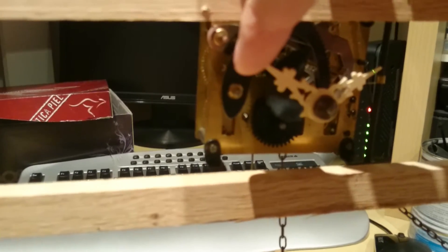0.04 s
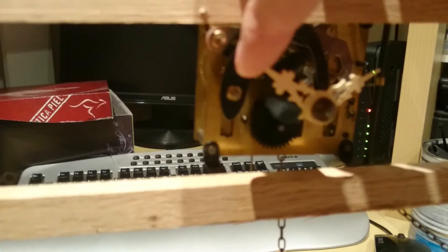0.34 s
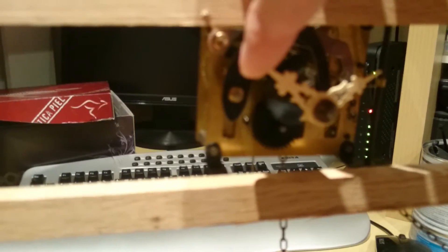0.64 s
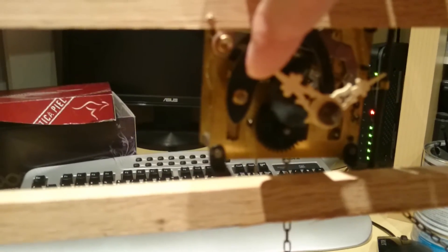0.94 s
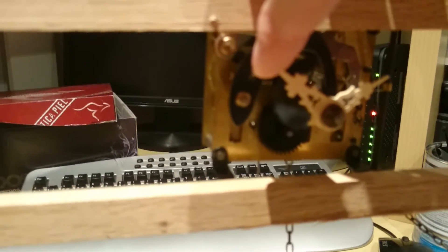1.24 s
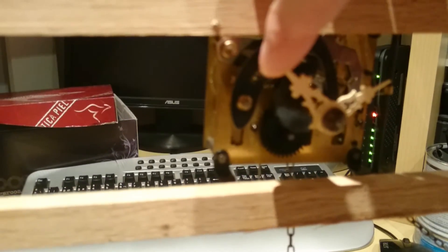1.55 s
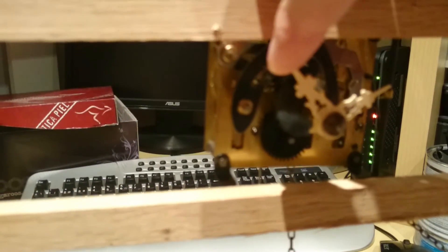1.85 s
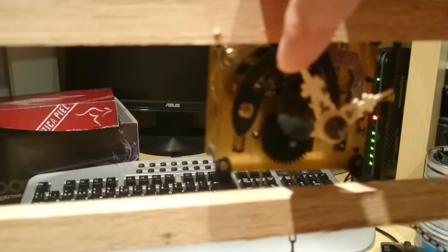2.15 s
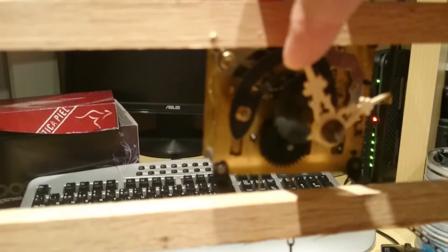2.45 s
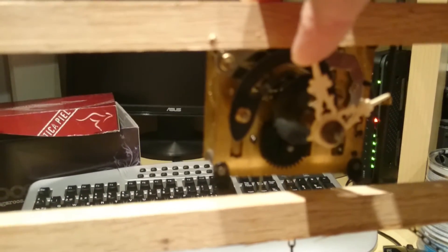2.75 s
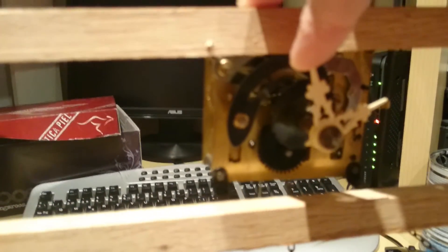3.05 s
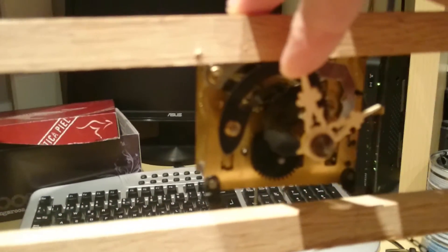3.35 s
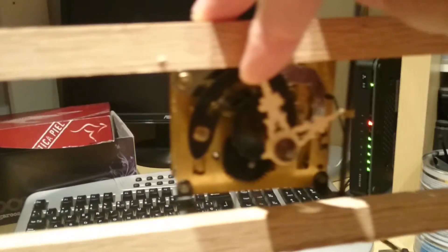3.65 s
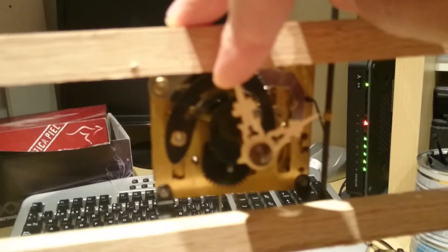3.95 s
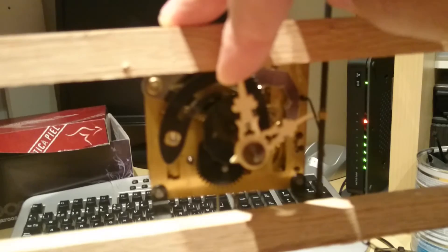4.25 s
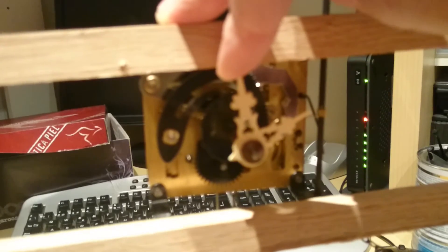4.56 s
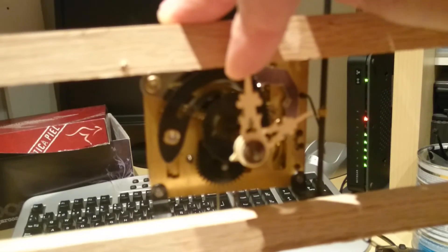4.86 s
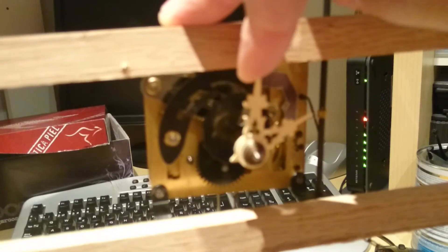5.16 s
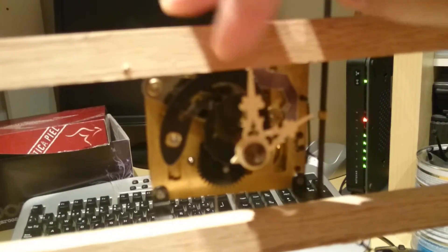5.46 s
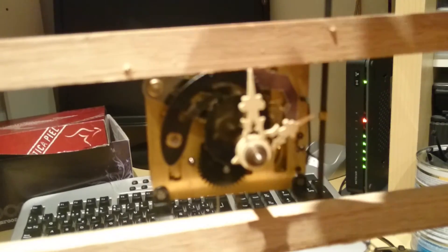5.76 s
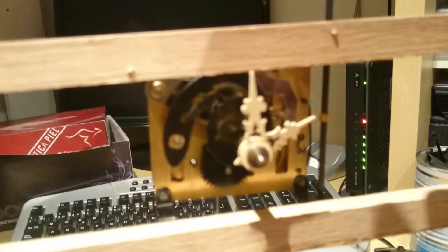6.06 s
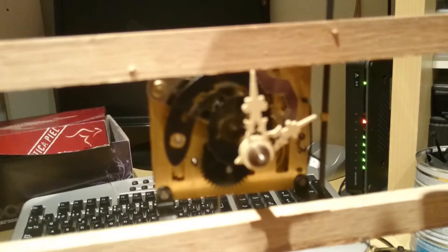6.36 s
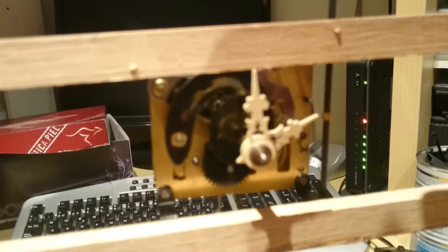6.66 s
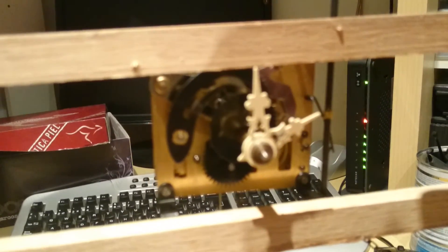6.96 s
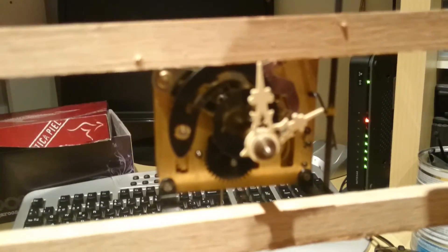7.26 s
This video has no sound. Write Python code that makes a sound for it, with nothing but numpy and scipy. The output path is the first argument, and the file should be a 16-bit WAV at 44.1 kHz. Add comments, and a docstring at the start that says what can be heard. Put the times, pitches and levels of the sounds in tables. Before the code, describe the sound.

A brass clock movement is heard close up in a small quiet room with a faint steady hiss. As its hand is pushed round, there is a quick cluster of faint ticks at about 1.1 seconds, fainter ones near 1.7 and 2.2, and another at 4.2. At 5.2 seconds a steel lever drops with a bright double click, and the gears spin up into a much louder, fast whirring rattle, dotted with small clicks and scrapes. A hammer falls twice, at about 5.8 and 6.5 seconds, each time with a short metallic clank and a brief low hum from its swinging wire. At 6.8 seconds the wheels slam against their stop with a hard clack, a slight thud and two quick rebounds. The whirr dies at once, leaving only the quiet hiss from just after 7 seconds.

```python
"""A finger pushes the minute hand of a brass clock movement round to the hour, with a few faint ticks.
At 5.2 s a lever drops and frees the strike train: the wheels spin up and whirr, tooth against pinion.
They lift and drop the hammer twice; it clanks and swings on its wire. At 6.8 s the train slams
against its stop and bounces. Heard close up in a small quiet room."""
import sys
import numpy as np
from scipy import signal
from scipy.fft import rfft, irfft, next_fast_len
from scipy.io import wavfile
from scipy.ndimage import uniform_filter1d, map_coordinates

SR = 44100
rng = np.random.default_rng(int(sys.argv[2]) if len(sys.argv) > 2 else 0)


def transcribe(u):
    """Save the signal u as a 16-bit wav file named by the first command-line argument.

    u: samples, shape (n,) or (channels, n), limited to [-1, 1]; the rate is SR.
    q: integer samples, one column per channel.
    """
    v = np.clip(np.atleast_2d(u).T, -1, 1)
    q = np.round(v * 32767).astype(np.int16)
    wavfile.write(sys.argv[1], SR, q)


N = 348390
TIME_S = np.arange(N) / SR
FFT_SIZE = next_fast_len(N + SR)
HZ = np.fft.rfftfreq(FFT_SIZE, 1 / SR)
LANDING_S = 0.029  # hammer snap to landing

# Fall and bounce of the release lever. Each row: time in seconds, level in dB.
LEVER_DROPS = [(5.237, -22), (5.2623, -30)]
# Hammer strokes. Each row: snap time in seconds, level in dB, delay of the swing in seconds.
HAMMER_STROKES = [(5.761, 1, 0.011), (6.46, -0.5, .006)]
# Slam and two rebounds. Each row: time in seconds, crack in dB, shudder in dB, rise in seconds.
STOP_SLAMS = [(6.8093, -8.5, -24, 0.0014), (6.866, -12.5, -31.5, .0035), (6.927, -27.5, -35, .001)]
# Colour of the movement. Each row: frequency in Hz, left gain in dB, right gain in dB.
BRASS_COLOUR = [(204, -36.5, -22.5), (370, -24, -17.5), (520, -24.5, -14), (1210, -18, -14.5),
                (2400, -17, -14), (3520, -19, -7), (5814, -5, -14.5), (5470, -9.5, 0.5), (6660, 2, -18.5),
                (6970, -8, -12), (8070, -8.5, -16.5), (9600, -11, -22.5), (10800, -24, -20.5),
                (13000, -23, -17), (15500, -32, -17)]


def train(level_db, teeth_per_s, chatter_db, scatter_db, tooth_t60_s, rub_db, waver_db):
    """Each tooth strikes its pinion; the loose fly chatters between them, and the pivots rub."""
    pace = train_pace()
    tooth_hz = teeth_per_s * pace
    teeth = np.diff(np.floor(np.cumsum(tooth_hz) / SR), prepend=0)
    chatter = rng.random(N) < 2 * tooth_hz / SR
    chance_db = scatter_db * rng.standard_normal(N)
    blows = teeth * amp(chance_db / 2) + chatter * amp(chatter_db + chance_db)
    energy_pole = decay(2 / SR, tooth_t60_s)
    strikes = signal.lfilter([1], [1, -energy_pole], blows ** 2) * pace  # slow teeth land softly
    rub = amp(rub_db) ** 2 * np.sqrt(pace)
    force = amp(level_db + waver_db * wobble(knots_per_s=22)) * tooth_force()  # uneven mesh

    def drive(energy):
        return np.sqrt(energy / energy[pace > 0.5].mean()) * force * grit()

    body = brass(low_hz=160, high_hz=18000)
    low_share = 1 / (1 + (HZ / 9000) ** 8)  # mostly blows below 9 kHz, rubbing above
    whirr = filtered(drive(strikes + rub / 10), body * np.sqrt(low_share))
    return whirr + filtered(drive(strikes / 10 + rub), body * np.sqrt(1 - low_share))


def train_pace(spin_up_s=0.18, run_down_s=0.06):
    """Speed, 0-1: the freed train rises to what its fly allows and runs down at the stop."""
    running_s = np.maximum(TIME_S - LEVER_DROPS[0][0], 0)
    stopped_s = np.maximum(TIME_S - STOP_SLAMS[0][0], 0)
    return (1 - np.exp(-running_s / spin_up_s)) * np.exp(-(stopped_s / run_down_s) ** 2 / 2)


def tooth_force():
    """Faster wheels hit harder."""
    return amp(-47) * train_pace() ** 1.82


def hammer(wire_hz, swell_s, swing_t60_s, tremble_db, tremble_width_hz,
           clank_db, jolt_db, swing_db, shake_db):
    """The hammer clanks and swings on its wire; the train keeps it trembling, a rebound jolts it."""
    # Each row: mode frequency in Hz, level in dB, t60 in seconds.
    modes = [(512, -11.5, 0.33), (715, -16, 0.2), (1030, -7, 0.16), (1063, -1.5, 0.18), (1456, -3.5, 0.12),
             (1640, -2, .07), (1706, 3.5, 0.19), (1810, -4, 0.08)]
    clanks, swing = np.zeros((2, N)), np.zeros(N)
    t = np.arange(SR) / SR
    swell = 1 - np.exp(-(t / swell_s) ** 2)
    sway = swell * decay(t, swing_t60_s) * np.sin(2 * np.pi * wire_hz * t)
    for at_s, db, delay_s in HAMMER_STROKES:
        add(clanks, at_s, amp(db + clank_db) * ring(modes))
        add(clanks, at_s + LANDING_S, amp(db + clank_db) * ring(modes))
        add(swing, at_s + delay_s, amp(db + swing_db) * sway)
    rebound_s = STOP_SLAMS[1][0]
    add(clanks, rebound_s, amp(jolt_db) * ring(modes))
    add(swing, rebound_s, amp(shake_db) * sway)
    tremble = amp(tremble_db) * tooth_force() * train_pace() ** 3
    wire = unit(1 / (1 + (2 * (HZ - wire_hz) / tremble_width_hz) ** 2))
    swing += filtered(tremble * rng.standard_normal(N), causal(wire))
    return clanks * amp([[-4], [2]]) + swing * [[-0.56], [1]]  # bass in antiphase left to right


def hammer_blows(snap_db, snap_t60_s, landing_db, landing_t60_s):
    """Plate drive of each stroke: a blunt snap off the pin, then a sharper landing."""
    snaps, landings = np.zeros((2, N))
    for at_s, db, _ in HAMMER_STROKES:
        snaps += amp(db + snap_db) * contact(at_s, snap_t60_s, rise_s=0.002, hold_s=0.0054)
        landings += amp(db + landing_db) * contact(at_s + LANDING_S, landing_t60_s, rise_s=0.00068)
    return in_bands(snaps, low_db=-10, top_db=-8) + in_bands(landings, low_db=-23.5, top_db=-11)


def stop(crack_t60_s, shudder_t60_s):
    """Plate drive of each slam: a hard crack, then the whole movement shudders."""
    cracks, shudders = np.zeros((2, N))
    for at_s, crack_db, shudder_db, rise_s in STOP_SLAMS:
        cracks += amp(crack_db) * contact(at_s, crack_t60_s, rise_s)
        shudders += amp(shudder_db) * contact(at_s, shudder_t60_s, rise_s, hold_s=0.008)
    return in_bands(cracks, low_db=-29.5, top_db=-15.5) + in_bands(shudders, low_db=-6, top_db=-5)


def knocks(click_t60_s, scrape_t60_s):
    """Plate drive of levers that scrape along the turning wheels and click off an edge."""
    # Each row: time in seconds, click in dB, its top band in relative dB, scrape in dB,
    # scrape lead in seconds.
    events = [(0.077, -56.5, -21, -60, 0), (5.215, -48.5, 1, -50, 0.0023), (5.438, -34, -9.5, -50.5, 0.028),
              (5.593, -20.5, -8, -38.5, 0.0164), (5.9675, -21, -18, -35, 0.023), (5.989, -33, -6, -38, 0),
              (6.168, -26, -8, -37, .014), (6.6495, -21, -4.5, -36.5, 0.004),
              (6.782, -26.5, -16, -42, 0.006)]
    drive = np.zeros((3, N))
    for at_s, click_db, top_db, scrape_db, lead_s in events:
        click = amp(click_db) * contact(at_s, click_t60_s, rise_s=0.001)
        scrape = amp(scrape_db) * contact(at_s - lead_s, scrape_t60_s, rise_s=0.002, hold_s=lead_s)
        drive += in_bands(click, low_db=-20, top_db=top_db) + in_bands(scrape, low_db=-4.5, top_db=-7)
    return drive


def plates(drive, level_db):
    """The brass plates sound each contact in a low, a middle and a top band."""
    bands_hz = [(590, 2550), (2380, 10020), (9500, 17910)]
    bands = [filtered(envelope * grit(), brass(*edges)) for envelope, edges in zip(drive, bands_hz)]
    return amp(level_db) * sum(bands)


def lever(ring_db, crack_db, crack_t60_s, rattle_db, rattle_t60_s):
    """The steel release lever lands with a crack and a short bright ring, and shakes the plates."""
    # Each row: mode frequency in Hz, level in dB, t60 in seconds.
    modes = [(634, -18, 0.15), (1296, -3.5, 0.072), (1550, -11.5, .06), (2495, -2, 0.078),
             (3600, -9.5, 0.12), (3790, -11.5, 0.096), (4910, -11, 0.045), (7390, 4.5, 0.038),
             (9600, -2.5, 0.061), (11100, -7, 0.099)]
    rings, cracks, rattles = np.zeros((2, N)), np.zeros(N), np.zeros(N)
    for at_s, db in LEVER_DROPS:
        add(rings, at_s, amp(db + ring_db) * ring(modes))
        cracks += amp(db + crack_db) * contact(at_s, crack_t60_s, rise_s=0.00056)
        rattles += amp(db + rattle_db) * contact(at_s, rattle_t60_s, rise_s=0.00099)
    crack = brass_noise(cracks, low_hz=6900, high_hz=16000)
    return rings + crack + brass_noise(rattles, low_hz=670, high_hz=4850)


def low_rattle(level_db, swell_s, t60_s, thud_db, thud_t60_s):
    """A low rattle swells as the train nears its stop; the slams thud through the wooden stand."""
    slam_s, rebound_s = STOP_SLAMS[0][0], STOP_SLAMS[1][0]
    swell = amp(level_db) * contact(slam_s, t60_s, swell_s, hold_s=rebound_s - slam_s)
    thuds = sum(amp(db + thud_db) * contact(at_s + 0.005, thud_t60_s, rise_s=0.004)
                for at_s, _, db, _ in STOP_SLAMS)
    return brass_noise(swell, low_hz=560, high_hz=1696) + brass_noise(thuds, low_hz=150, high_hz=430)


def hand_ticks(rise_s, t60_s):
    """Teeth behind the dial slip into place and ring the pushed hand; soft slips are duller."""
    # Each row: time in seconds, level in dB, ring in relative dB, low-pass cutoff in Hz.
    ticks = [(1.114, -44.5, -15, 15000), (1.135, -46, -20, 15000), (1.151, -48, -13.5, 15000),
             (1.684, -55.5, -23, 8000), (2.171, -57, -25, 11000), (2.196, -59, -24, 13000),
             (4.175, -47, -26, 11100)]
    # Each row: mode frequency in Hz, level in dB, t60 in seconds.
    hand_modes = [(586, -8, 0.14), (723, -3, 0.17), (840, -4, .13), (1020, -7, .12), (3290, -0.5, 0.041),
                  (3900, 2, 0.11), (6540, 0, 0.029), (7180, 6, .04)]
    # Each row: frequency in Hz, gain in dB.
    slip_colour = [(300, -14), (750, -12.5), (1600, -12), (3500, -11.5), (5200, -15), (6800, -12.5),
                   (9000, -12), (11000, -15.5), (15500, -5.5)]
    rings, slips = np.zeros((2, 2, N))
    for at_s, db, ring_db, cutoff_hz in ticks:
        add(rings, at_s, amp(db + ring_db) * ring(hand_modes))
        slip = amp(db) * contact(at_s, t60_s, rise_s) * rng.standard_normal((2, N))
        slips += signal.sosfilt(signal.butter(3, cutoff_hz, fs=SR, output="sos"), slip)
    return rings + filtered(slips, causal(unit(amp(along(slip_colour, HZ)))))


def room(x, low_hz):
    """Reverberation: each frequency dies at its own rate, and little bass comes back."""
    # Each row: frequency in Hz, t60 in seconds.
    wall_decay = [(200, .4), (2000, 0.54), (6000, 0.22), (14000, 0.26)]
    hz, t, spectra = signal.stft(rng.standard_normal((2, SR // 2)), SR, nperseg=256)
    tail = signal.istft(spectra * decay(t, along(wall_decay, hz)[:, None]), SR, nperseg=256)[1]
    tail = np.pad(tail / np.linalg.norm(tail[0]), ((0, 0), (SR // 200, 0)))  # 5 ms pre-delay
    high_pass = 1j * HZ / (1j * HZ + low_hz)
    return filtered(signal.fftconvolve(x, tail, axes=1)[:, :N], high_pass)


def hiss(level_db):
    """Steady room air and microphone hiss."""
    # Each row: frequency in Hz, relative density in dB.
    spectrum = [(25, -20), (45, -10.5), (70, -2.5), (150, -2), (450, -1.5), (1200, -5), (2800, -10.5),
                (4700, -19.5), (6200, -16), (8500, -17.5), (11000, -25.5), (15500, -18.5)]
    # Each row: frequency in Hz, left-right correlation.
    correlation = [(60, 0.039), (240, -0.66), (950, -0.12), (3770, 0.062), (15000, -0.057)]
    angle = np.arccos(along(correlation, HZ)) / 2
    gains = amp(along(spectrum, HZ)) * [np.cos(angle), np.sin(angle)]
    mid, side = filtered(rng.standard_normal((2, N)), gains)
    return amp(level_db) * unit(np.array([mid + side, mid - side])) * amp([[-1.2], [1.1]])


def ring(modes):
    """Stereo ring of a struck part; each blow stirs the modes anew, and each wavers slightly."""
    t = np.arange(SR // 2) / SR
    sound = np.zeros((2, len(t)))
    for hz, db, t60_s in modes:
        pan_db = (along(BRASS_COLOUR, hz, column=1) - along(BRASS_COLOUR, hz, column=2)) / 2
        level = amp(db + np.array([[pan_db], [-pan_db]]) + rng.standard_normal((2, 1)))
        drift = np.cumsum(rng.standard_normal((2, len(t))), axis=1) * np.sqrt(hz / SR / 300)
        phase = 2 * np.pi * (hz * t + rng.random((2, 1))) + drift
        sound += level * decay(t, t60_s) * np.sin(phase)
    return sound


def brass(low_hz, high_hz):
    """Stereo response of the movement in one band, power gain 1."""
    # Each row: frequency in Hz, width in Hz, lift in dB.
    plate_modes = [(522.4, 46, 11), (719, 30, 8), (860, 150, 0), (1040, 55, 3), (1694, 39, 11),
                   (2490, 70, 4), (2846, 36, 7), (3598, 70, 7.5), (3840, 80, 6), (4920, 89, 6),
                   (5983, 154, 7.5), (6340, 92, 0.5), (6620, 500, 5), (9240, 47, 5.5)]
    colour_db = uniform_filter1d([along(BRASS_COLOUR, HZ, column) for column in (1, 2)], size=1500)
    peaks_db = sum(db / (1 + (2 * (HZ - hz) / width_hz) ** 2) for hz, width_hz, db in plate_modes)
    band = 1 / np.sqrt((1 + (low_hz / (HZ + 1)) ** 12) * (1 + (HZ / high_hz) ** 12))
    return causal(unit(amp(colour_db + peaks_db) * band))


def brass_noise(envelope, low_hz, high_hz):
    """Shaped stereo noise through one band of the movement."""
    return filtered(envelope * rng.standard_normal((2, N)), brass(low_hz, high_hz))


def contact(at_s, t60_s, rise_s, hold_s=0):
    """Contact envelope: climbs 20 dB per rise_s until at_s, holds, decays."""
    envelope, start_s = np.zeros(N), max(at_s - 0.25, 0)
    t = start_s - at_s + np.arange(3 * SR // 4) / SR
    db = np.where(t < 0, 20 * t / rise_s, -60 * np.maximum(t - hold_s, 0) / t60_s)
    add(envelope, start_s, amp(db))
    return envelope


def in_bands(envelope, low_db, top_db):
    """Low, middle and top drive of a contact."""
    return amp([[low_db], [0], [top_db]]) * envelope


def grit(common_share=0.35, right_lag_s=0.001):
    """Stereo contact noise; the common part arrives later on the right."""
    own, common = rng.standard_normal((2, N)), rng.standard_normal(N)
    pair = np.array([common, np.roll(common, round(right_lag_s * SR))])
    return np.sqrt(1 - common_share) * own + np.sqrt(common_share) * pair


def wobble(knots_per_s):
    """Smooth random curve."""
    return map_coordinates(rng.standard_normal(1000), [TIME_S * knots_per_s], mode="wrap")


def causal(gain):
    """Minimum-phase response with this gain: rings only after a blow."""
    cepstrum = irfft(np.log(np.maximum(gain, 1e-6)), FFT_SIZE)
    cepstrum[..., 1:FFT_SIZE // 2] *= 2
    cepstrum[..., FFT_SIZE // 2 + 1:] = 0
    return np.exp(rfft(cepstrum))


def filtered(x, response):
    return irfft(rfft(x, FFT_SIZE) * response, FFT_SIZE)[..., :N]


def along(table, hz, column=1):
    """Table column interpolated over log frequency."""
    columns = np.transpose(table)
    return np.interp(np.log(hz + 1), np.log(columns[0] + 1), columns[column])


def add(track, at_s, sound):
    part = track[..., round(at_s * SR):][..., :sound.shape[-1]]
    part += sound[..., :part.shape[-1]]


def decay(t, t60_s):
    return np.exp(-np.log(1000) * t / t60_s)


def amp(db):
    return 10 ** (np.asarray(db) / 20)


def unit(x):
    """Scale to rms 1."""
    return x / np.sqrt(np.mean(x ** 2) + 1e-20)


def scene():
    """The clock, its room and the hiss behind it."""
    clock = hand_ticks(rise_s=0.001, t60_s=0.038)
    clock += lever(ring_db=-18, crack_db=-10, crack_t60_s=0.029, rattle_db=-21, rattle_t60_s=0.12)
    clock += train(level_db=5, teeth_per_s=90.3, chatter_db=-5.5, scatter_db=2, tooth_t60_s=0.017,
                   rub_db=2, waver_db=0.98)
    drive = knocks(click_t60_s=0.022, scrape_t60_s=0.14)
    drive += hammer_blows(snap_db=-28, snap_t60_s=0.055, landing_db=-22, landing_t60_s=0.03)
    drive += stop(crack_t60_s=0.017, shudder_t60_s=0.16)
    clock += plates(drive, level_db=-7)
    clock += low_rattle(level_db=-46.5, swell_s=0.2, t60_s=0.2, thud_db=-31, thud_t60_s=0.17)
    clock += hammer(wire_hz=106.2, swell_s=0.03, swing_t60_s=0.33, tremble_db=-9, tremble_width_hz=44,
                    clank_db=-46, jolt_db=-44, swing_db=-28.5, shake_db=-40.5)
    return clock + amp(-10) * room(clock, low_hz=350) + hiss(level_db=-65)


def record(dry):
    """Brick-wall low-pass at 15850 Hz."""
    return filtered(dry, HZ < 15850)


dry = scene()
out = record(dry)
transcribe(out)
```